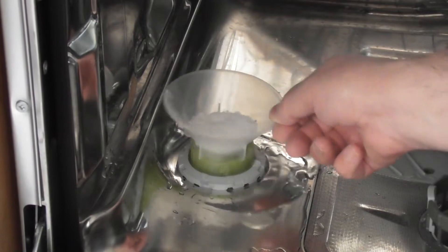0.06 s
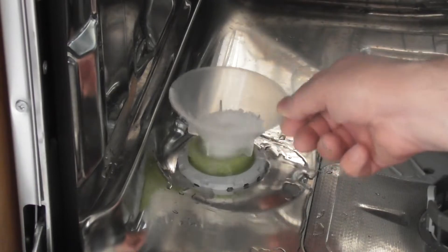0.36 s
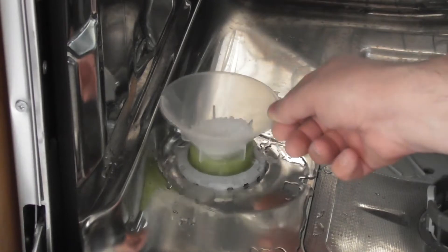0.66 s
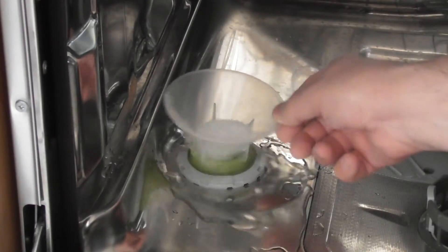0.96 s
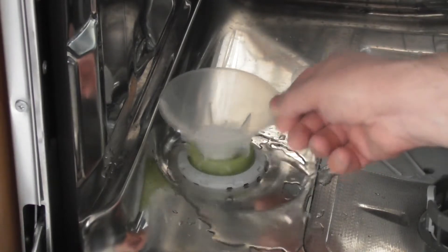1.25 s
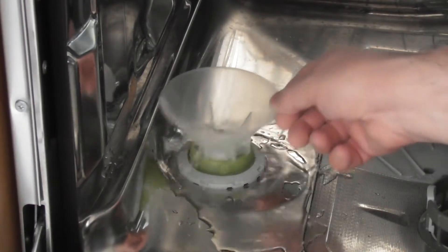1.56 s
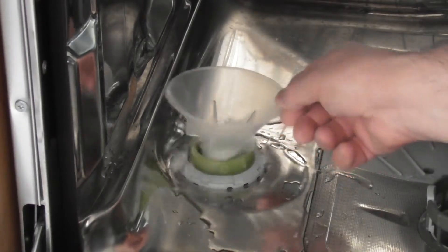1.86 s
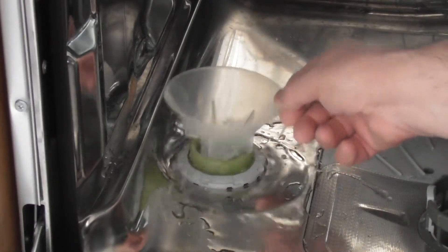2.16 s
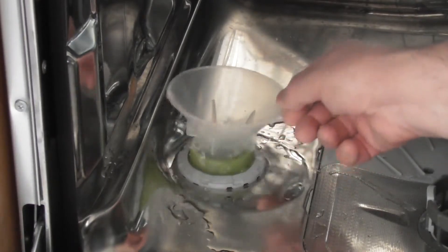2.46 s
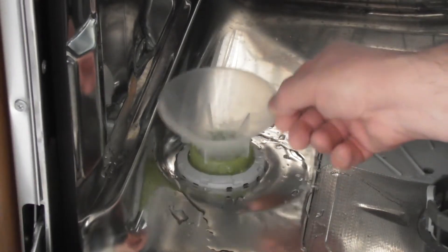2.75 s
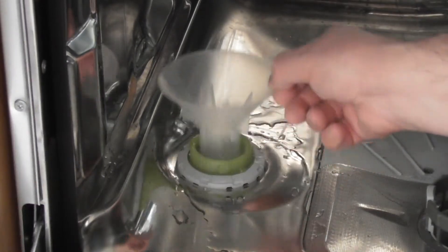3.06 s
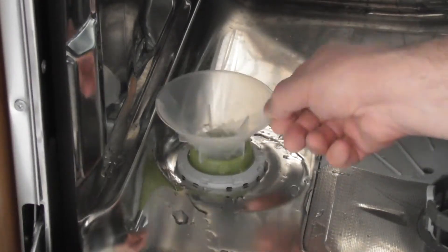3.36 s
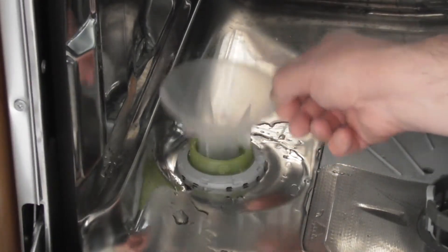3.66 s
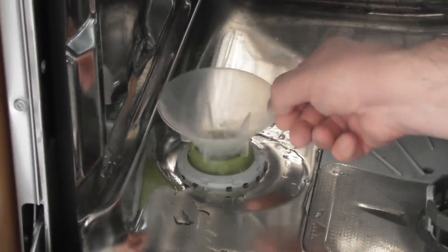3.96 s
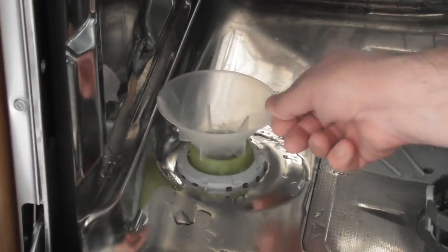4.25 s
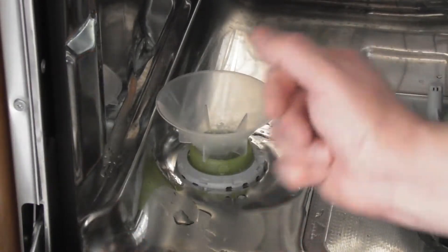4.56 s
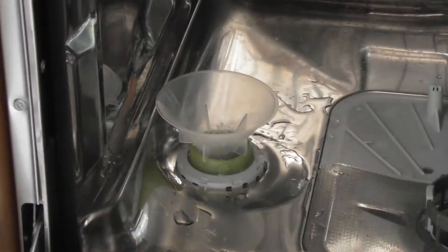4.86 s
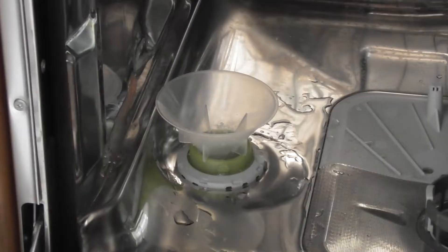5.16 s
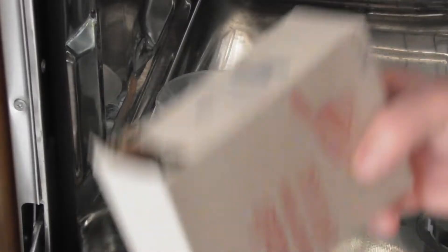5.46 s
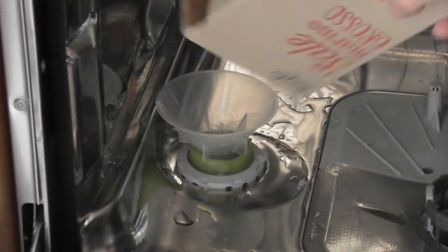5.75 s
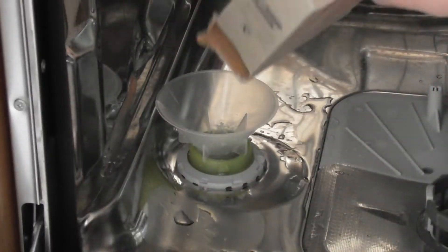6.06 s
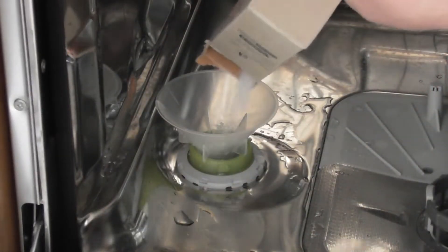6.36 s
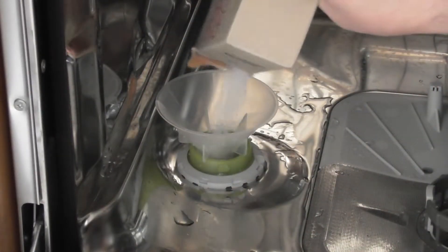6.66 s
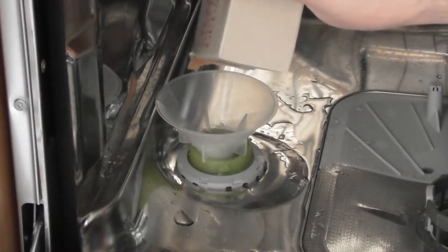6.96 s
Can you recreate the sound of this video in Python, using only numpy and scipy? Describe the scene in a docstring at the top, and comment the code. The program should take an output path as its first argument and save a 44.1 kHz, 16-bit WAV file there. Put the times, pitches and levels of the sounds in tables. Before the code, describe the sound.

For the first 2.4 seconds a plastic funnel knocks against a tank neck in a steel dishwasher tub, up to about seven times a second and growing louder. Each knock has a short metallic ring, a gritty rattle of coarse salt and a soft low gulp from the tank. From about 2 to 3 seconds a few small water blips sound. The knocks then thin out, with light rim ticks, short slips of salt and stronger single knocks near 2.7, 3.4 and 4 seconds. From 4.5 seconds it is quieter: a cardboard box is picked up with dull bumps, and salt shifts inside in brief rustles. At 6 seconds salt slides along the card and pours into the funnel with a bright, crackling hiss, fading just after 7 seconds. Everything is close, with brief steel reflections over faint kitchen air.

```python
"""Coarse salt is shaken down a plastic funnel into the softener tank of a steel dishwasher tub.
For 2.4 s the spout knocks on the filler neck, up to about seven times a second; crystals hop, land
and trickle, and the tank gulps. The knocks thin out, with water blips and light ticks on the rim.
From 4.5 s a cardboard box is picked up: it bumps, and the salt shifts inside. At 6 s it is tilted:
salt slides along the card and rattles into the funnel."""
import sys
import numpy as np
from scipy import signal
from scipy.fft import rfft, irfft, next_fast_len
from scipy.io import wavfile
from scipy.ndimage import uniform_filter1d, map_coordinates

SR = 44100
rng = np.random.default_rng(int(sys.argv[2]) if len(sys.argv) > 2 else 0)


def persist_wave(psi):
    """Save psi, clipped to +-1, as 16-bit WAV."""
    counts = np.round(np.clip(psi, -1, 1) * 32767).astype(np.int16)
    wavfile.write(sys.argv[1], SR, np.atleast_2d(counts).T)


N = 317961

# Table levels are relative; spectra give shape only.
# kitchen air, coloured by the tub: freq_hz, density_db
AIR_SPECTRUM = [(25, -28), (50, 8), (100, -4), (200, 0.5), (450, -10), (900, -7), (1100, -18), (1350, -12),
                (1700, -26), (2600, -26), (3800, -18), (5200, -27), (7800, -21.5), (15800, -30)]
# low hum: pitch_hz, level_db
HUM_TONES = [(48.4, -69.5)]
# ring of the tub: freq_hz, t60_s
TUB_DECAY = [(150, .3), (600, .36), (2000, .38), (8000, .28), (15000, .22)]
# stereo width: freq_hz, side_db
SIDE_GAIN = [(60, -4), (170, -9), (350, -13), (1400, -22), (2800, -50), (6000, -94), (9000, -22),
             (12000, -7.5)]

# water blips at the neck of the full tank: start_s, pitch_hz, level_db
WATER_BLIPS = [(1.925, 2920, -40), (2.025, 1990, -37), (2.19, 950, -55), (2.607, 820, -43),
               (2.64, 686, -41), (2.673, 2040, -41), (2.722, 2000, -36), (2.878, 2320, -42)]
# funnel touches the rim: start_s, level_db
RIM_TICKS = [(3.145, -36.5), (3.25, -46.5), (3.5427, -42.5), (3.579, -40.5), (3.647, -47), (3.823, -49),
             (3.8543, -46), (4.0567, -36)]
# ring of the rim: pitch_hz, level_db, t60_s
RIM_MODES = [(3560, -10, .06), (3810, -10, .07)]

# salt shifts in the lifted box: start_s, crystals_db, card_db, rise_s, t60_s
BOX_SHIFTS = [(4.53, -61, -52.5, 0.022, 0.68), (4.70, -46, -53, 0.025, 0.86),
              (4.996, -41.5, -46, 0.012, 0.4), (5.107, -37, -46, 0.0084, 0.39),
              (5.248, -40, -40.5, 0.017, 0.31), (5.317, -47, -50.5, 0.0028, 0.96),
              (5.654, -59, -54.5, 0.0064, 0.32), (5.774, -47.5, -50, 0.018, 0.58),
              (5.869, -43, -45.5, 0.0089, 0.69), (5.941, -37, -41, 0.0096, 0.18)]
# hand bumps the box: centre_s, level_db, half_width_s
HAND_BUMPS = [(4.833, -45, 0.096), (5.05, -45.5, 0.073), (5.5, -53.5, 0.22)]
# handled box: freq_hz, density_db
BUMP_SPECTRUM = [(30, 9), (65, -1), (130, 8), (220, 2), (300, -7), (450, 6), (800, -1.5), (1400, -9),
                 (2500, -25.5)]
# salt on cardboard: freq_hz, density_db
CARD_SPECTRUM = [(900, -22.5), (1600, 1), (2500, -7), (3700, 3), (4300, -1), (5000, -8.5), (6200, 1.5),
                 (9000, -29)]
# hollow box: freq_hz, density_db
BOX_SPECTRUM = [(180, -51), (300, -64), (317, -56), (387, -4.5), (589, 6.5), (674, -12), (778, 7),
                (904, -5), (1280, 3), (1510, -8.5), (1640, -19), (2000, -22), (2600, 7), (4400, -120)]
# empty funnel: freq_hz, density_db
FUNNEL_SPECTRUM = [(350, -43), (480, -4.5), (590, 4.5), (680, -6), (780, 6.5), (900, -8.5), (1300, -36),
                   (2000, -54)]
# course of the pour: time_s, crystals_db, slide_db, box_wall_db
POUR_LEVELS = [(6.0, -56, -52, -53.5), (6.134, -28, -33, -37), (6.258, -33, -36.5, -39),
               (6.302, -27, -44, -46.5), (6.434, -20, -44, -45.5), (6.534, -25, -43, -45),
               (6.808, -21.5, -37.5, -41), (7.006, -21.5, -46, -53.5), (7.068, -38, -48.5, -63),
               (7.21, -51.5, -63.5, -65)]
# lumps in the poured stream: start_s, level_db
SALT_LUMPS = [(6.289, -9.5), (6.321, -13.5), (6.4175, -12), (6.649, -7.5), (6.7098, -22), (6.775, -7),
              (6.8382, -6), (6.915, -13), (6.947, -13.5), (7.06, -19.5), (7.083, -20), (7.104, -28),
              (7.131, -26.5)]
# falling salt: freq_hz, density_db
POURED_SPECTRUM = [(2500, -44), (3900, -13), (5000, -19), (6000, -3), (7500, 2.5), (9300, 1), (11000, -6.5),
                   (12500, -14), (15800, -22.5)]

# trickling salt and stirring spout: time_s, trickle_db, stir_db
TRICKLE_LEVELS = [(0.0, -41.5, -42), (0.29, -52.5, -59.5), (0.63, -46, -48.5), (2.33, -49.5, -43),
                  (2.96, -54, -53.5), (3.12, -62.5, -55.5), (3.4, -62, -65), (3.51, -60, -51.5),
                  (4.22, -55, -48), (4.5, -69, -65.5)]
# salt flow through the spout: time_s, flow_db
SPOUT_FLOW = [(0, -18), (.72, -14), (1.0, -5.5), (1.4, -0.5), (1.95, 0), (2.42, -2.5), (2.55, -13.5),
              (3.0, -9), (3.39, -5), (3.9, -14), (4.2, -10)]
# salt slips down the funnel wall: start_s, level_db, rise_s, t60_s
SALT_SLIPS = [(0.02, -43, .02, .2), (0.255, -42.5, 0.008, 0.23), (0.32, -39.5, 0.017, .2),
              (0.525, -41, .005, .1), (0.88, -36, .006, .12), (1.012, -34, .008, 0.14),
              (1.586, -39, 0.01, 0.066), (2.545, -34.5, 0.0065, 0.085), (2.785, -40, 0.01, 0.5),
              (2.93, -37.5, 0.02, 0.15), (3.0, -43, 0.018, 0.26), (3.337, -34, .003, 0.21),
              (3.351, -23.5, .013, .1), (3.509, -45, 0.0095, 0.14), (3.728, -26.5, 0.0064, .09),
              (3.79, -44.5, 0.037, 0.11), (4.045, -44, 0.0063, 0.17), (4.167, -32, 0.0019, 0.28),
              (4.36, -51.5, 0.014, 0.17)]
# shaken salt: freq_hz, density_db
SHAKEN_SPECTRUM = [(1500, -3.5), (2800, -8.5), (3800, -2.5), (5000, -9.5), (6400, 6), (8500, 7),
                   (10500, -3.5), (12500, -13.5), (15800, -24.5)]

# spout knocks on the neck and throws the salt; the last knock, at 5 s, is the box bumping
# as it is picked up: start_s, knock_db, landing_db
KNOCK_EVENTS = [(0.105, -22.5, -30), (0.363, -24.5, -25.5), (0.466, -20.5, -26.5), (0.61, -20.5, -24.5),
                (0.709, -21, -34), (0.841, -18, -29.5), (0.979, -18, -34), (1.122, -19, -32.5),
                (1.25, -19, -28), (1.392, -14, -27), (1.538, -12, -29), (1.678, -20.5, -34),
                (1.811, -14, -28), (1.954, -14.5, -27.5), (2.101, -11.5, -30), (2.245, -12, -27),
                (2.393, -11, -25.5), (2.513, -31, -40), (2.693, -17.5, -38), (2.837, -27, -50),
                (2.965, -33.5, -47), (3.148, -36.5, -38), (3.388, -13.5, -48), (3.578, -31, -41),
                (3.712, -29.5, -41.5), (3.965, -13.5, -27.5), (4.211, -22.5, -51), (5.013, -31.5, -40)]
# funnel, neck and tub floor ringing together: pitch_hz, level_db, t60_s
NECK_MODES = [(395, -22, 0.17), (476, -22, 0.16), (544.5, -3, 0.24), (644.8, -15, 0.32), (793, -14.5, 0.19),
              (927, -33, 0.16), (1017, -19, 0.43), (1253, -16, 0.34), (1336, -4, 0.073),
              (1431.4, -15.5, 0.16), (1651, -8, 0.072), (1670, -9.5, 0.14), (1830, -19, 0.044),
              (1969, -14, 0.096)]
# dense ring of sheet steel: freq_hz, density_db
STEEL_SPECTRUM = [(150, -40), (250, -17), (313, -30.5), (416, -7.5), (537, 9), (727, -31.5), (911, 4.5),
                  (1120, -14), (1340, 5), (1520, -25), (1690, -3.5), (2180, -24.5), (2600, -27),
                  (3380, -38), (5720, -120)]
# hard plastic contact: freq_hz, density_db
PLASTIC_SPECTRUM = [(1200, -26), (2000, 10), (2600, 6.5), (3700, 18.5), (4500, 11.5), (5200, 4),
                    (9000, -41)]
# salt dropping in the tank: freq_hz, density_db
THUD_SPECTRUM = [(40, -26), (80, -2.5), (120, -9.5), (180, 4.5), (280, -7.5), (500, -43.5)]


def amp(db):
    """Decibels to gain."""
    return 10 ** (np.asarray(db) / 20)


def unit_rms(x):
    """Scale to rms 1."""
    return x / np.sqrt(np.mean(x ** 2) + 1e-20)


def log_interp(points, hz):
    """Read (freq_hz, value) points on a log axis."""
    freq_hz, values = np.transpose(points)
    return np.interp(np.log(hz + 1), np.log(freq_hz + 1), values)


def envelopes(rows):
    """One gain curve per dB column, silent outside the table."""
    time_s, *columns = np.transpose(rows)
    curves_db = [np.interp(np.arange(N) / SR, time_s, db, left=-120, right=-120) for db in columns]
    return [uniform_filter1d(amp(db), size=128) for db in curves_db]


def add(track, start_s, sound):
    """Mix a sound into a track."""
    start = max(round(start_s * SR), 0)
    track[start:start + len(sound)] += sound[:N - start]


def filtered(x, response):
    """Apply a complex frequency response."""
    size = next_fast_len(N + SR // 2)
    return irfft(rfft(x, size) * response(np.fft.rfftfreq(size, 1 / SR)), size)[..., :N]


def colour(x, spectrum, size=4096):
    """Minimum-phase filter that keeps the power of white noise."""
    magnitude = amp(log_interp(spectrum, np.fft.rfftfreq(size, 1 / SR)))
    cepstrum = irfft(np.log(np.maximum(magnitude, 1e-6)))
    cepstrum[1:size // 2] *= 2
    cepstrum[size // 2 + 1:] = 0
    pulse = irfft(np.exp(rfft(cepstrum)))
    return signal.fftconvolve(x, pulse / np.linalg.norm(pulse))[:N]


def wobble(rate_hz):
    """Smooth random curve through rate_hz knots a second."""
    knots = rng.standard_normal(int(N * rate_hz / SR) + 4)
    return map_coordinates(knots, [np.arange(N) * rate_hz / SR])


def patter(rate_hz, spread_db, hiss_db):
    """Tiny random impacts of uneven size over the hiss of finer dust, rms 1."""
    sizes = amp(spread_db * np.clip(rng.standard_normal(N), -2, 2)) * rng.choice([-1, 1], N)
    impacts = unit_rms(sizes * (rng.random(N) < rate_hz / SR))
    return unit_rms(impacts + amp(hiss_db) * rng.standard_normal(N))


def burst(t, rise_s, t60_s):
    """Envelope of a blow: quick swell, exponential fall."""
    return (1 - np.exp(-(t / rise_s) ** 2)) * amp(-60 * t / t60_s)


def outflow_db(time_s):
    """How freely salt runs through the spout."""
    return np.interp(time_s, *np.transpose(SPOUT_FLOW))


def room_tone(air_db=-58.5, hum_gain_db=-1):
    """Quiet kitchen air and a wavering low hum."""
    t = np.arange(N) / SR
    hum = np.zeros(N)
    for hz, db in HUM_TONES:
        phase = 2 * np.pi * hz * t + 0.3 * wobble(2.32)
        hum += amp(db + hum_gain_db) * np.sqrt(2) * np.sin(phase)
    return hum + amp(air_db) * colour(rng.standard_normal(N), AIR_SPECTRUM)


def tub_reflections(x, echo_gain=0.87, echo_s=0.002889, echo_above_hz=5500, early_db=-7, tail_db=-13):
    """A near steel wall mirrors the treble; the other walls scatter the sound and ring briefly."""
    def near_wall(hz):
        mirror = echo_gain / (1 + (echo_above_hz / (hz + 1)) ** 6)
        return (1 + mirror * np.exp(-2j * np.pi * hz * echo_s)) / np.hypot(1, mirror)

    near = filtered(x, near_wall)
    hz, frame_s, noise = signal.stft(rng.standard_normal(SR // 2), SR, nperseg=256)
    decay = amp(-60 * frame_s / log_interp(TUB_DECAY, hz)[:, None])
    _, tail = signal.istft(noise * decay, SR, nperseg=256)
    t = np.arange(len(tail)) / SR
    early = np.diff(rng.standard_normal(len(t) + 1)) * burst(t, 0.0008, 0.0088)
    walls = amp(early_db) * early / np.linalg.norm(early) + amp(tail_db) * tail / np.linalg.norm(tail)
    return near + signal.fftconvolve(near, walls)[:N]


def bubble(hz, t60_cycles):
    """A bubble rings and fades, rising in pitch."""
    t = np.arange(SR // 10) / SR
    return burst(t, 1 / hz, t60_cycles / hz) * np.sin(2 * np.pi * hz * t * (1 + t))


def water(centre_hz=900, spread_octaves=1.204, froth_db=-4, bubble_count=1400):
    """Water stirred by the spout: a soft froth of tiny bubbles and a few clear blips."""
    froth, blips = np.zeros((2, N))
    stir_end_s = TRICKLE_LEVELS[-1][0]
    for when, pitch in rng.random((bubble_count, 2)):
        hz = centre_hz * 2 ** (spread_octaves * (2 * pitch - 1))
        add(froth, when * stir_end_s, bubble(hz, t60_cycles=11.4))
    for start_s, hz, db in WATER_BLIPS:
        add(blips, start_s, amp(db) * bubble(hz, t60_cycles=88))
    _, stir = envelopes(TRICKLE_LEVELS)
    return amp(froth_db) * stir * unit_rms(froth) + blips


def stray_crystals(gain_db=-11):
    """Single crystals hop in the funnel and tick on its plastic wall."""
    trickle, _ = envelopes(TRICKLE_LEVELS)
    hops = patter(rate_hz=60, spread_db=3, hiss_db=-30)
    return colour(trickle * amp(gain_db) * hops, SHAKEN_SPECTRUM)


def rim_ticks(touch_db=-4, steel_db=-1, lead_s=0.0036):
    """Light touches of plastic ring the rim and stir the steel."""
    touches, ring = np.zeros((2, N))
    t = np.arange(SR // 4) / SR
    for start_s, db in RIM_TICKS:
        add(touches, start_s - lead_s, amp(db + touch_db) * burst(t, 0.0021, 0.13))
        for hz, mode_db, t60_s in RIM_MODES:
            add(ring, start_s, amp(db + mode_db) * burst(t, 0.0014, t60_s) * np.sin(2 * np.pi * hz * t))
    contact = touches * rng.standard_normal(N)
    return ring + colour(contact, PLASTIC_SPECTRUM) + amp(steel_db) * colour(contact, STEEL_SPECTRUM)


def box_pickup(shift_db=-1, wall_db=-4, bump_db=-3):
    """The hand bumps the box dully; the salt inside slips in short rustles."""
    crystals, card = np.zeros((2, N))
    t = np.arange(SR) / SR
    for start_s, crystals_db, card_db, rise_s, t60_s in BOX_SHIFTS:
        shift = burst(t, rise_s, t60_s)
        add(crystals, start_s, amp(crystals_db + shift_db) * shift)
        add(card, start_s, amp(card_db + shift_db) * shift)
    rub = card * patter(rate_hz=5500, spread_db=6.5, hiss_db=1.5)
    hiss = colour(crystals * patter(rate_hz=1400, spread_db=2, hiss_db=-9), SHAKEN_SPECTRUM)
    hand = sum(amp(db) / np.cosh((np.arange(N) / SR - centre_s) / half_width_s) ** 2
               for centre_s, db, half_width_s in HAND_BUMPS)
    bumps = colour(hand * amp(bump_db + 1.4 * wobble(35)) * rng.standard_normal(N), BUMP_SPECTRUM)
    return hiss + colour(rub, CARD_SPECTRUM) + amp(wall_db) * colour(rub, BOX_SPECTRUM) + bumps


def box_slide(slide_db=1, landing_s=6.205, landing_db=-31.5):
    """Salt slides on the card and drums the hollow box; the first of it rings the empty funnel."""
    _, slide, wall = envelopes(POUR_LEVELS)
    grit = patter(rate_hz=5000, spread_db=5, hiss_db=-5)
    sliding = colour(slide * amp(slide_db) * grit, CARD_SPECTRUM)
    drumming = colour(wall * patter(rate_hz=1500, spread_db=3, hiss_db=-5.5), BOX_SPECTRUM)
    landing = burst(np.maximum(np.arange(N) / SR - landing_s, 0), rise_s=0.022, t60_s=0.52)
    funnel = colour(amp(landing_db) * landing * rng.standard_normal(N), FUNNEL_SPECTRUM)
    return sliding + drumming + funnel


def poured_salt(flow_db=-1.5, coarse_db=-5, fall_s=6.28, strike_db=14, shatter_db=-5, surge_db=-13,
                offset_s=0.00085):
    """Loose crystals hiss inside the box, then fall and tick one by one on the funnel."""
    flow, _, _ = envelopes(POUR_LEVELS)
    debris, strikes = np.zeros((2, N))
    t = np.arange(SR // 4) / SR
    for start_s, db in SALT_LUMPS:  # a lump strikes, shatters and drags more salt after it
        add(strikes, start_s + offset_s, amp([db + strike_db]))
        shatter = amp(db + shatter_db) * burst(t, 0.0017, 0.057)
        surge = amp(db + surge_db) * burst(t, 0.011, 0.061)
        add(debris, start_s - offset_s, shatter + surge)
    inside = patter(rate_hz=5000, spread_db=4, hiss_db=0)
    fine = patter(rate_hz=1400, spread_db=5, hiss_db=-8)
    coarse = patter(rate_hz=130, spread_db=3, hiss_db=-40)
    falling = (fine + amp(coarse_db) * coarse) * amp(1.3 * wobble(60))
    crystals = np.where(np.arange(N) / SR < fall_s, inside, falling)
    spray = debris * patter(rate_hz=4000, spread_db=2, hiss_db=-5)
    return colour(flow * amp(flow_db) * crystals + strikes + spray, POURED_SPECTRUM)


def shaken_salt(clump_db=-3.2, rise_s=0.024, settle_s=0.1, packed_lag_s=0.002, loose_lead_s=0.011,
                hop_s=0.031, hop_db=-2, hop_db_per_flow_db=0.45, trickle_db=-2, scrape_db=-4):
    """At each knock a clump lands and hops once; in between, salt slips and the spout scrapes."""
    power = np.zeros(N)
    t = np.arange(-SR // 16, SR // 3) / SR
    gathering = amp(-14 - 60 * np.abs(t) / 0.095)
    clump = gathering + amp(60 * np.minimum(t / rise_s, -t / settle_s))
    for knock_s, _, landing_db in KNOCK_EVENTS:
        flow_db = outflow_db(knock_s)
        # packed salt lands just after the knock, loose salt ahead of it
        start_s = knock_s + packed_lag_s - loose_lead_s * amp(flow_db) + t[0]
        landing = amp(landing_db + clump_db) * clump
        hop = amp(hop_db + hop_db_per_flow_db * flow_db) * landing
        add(power, start_s, landing ** 2)
        add(power, start_s + hop_s, hop ** 2)
    for start_s, db, slip_rise_s, t60_s in SALT_SLIPS:
        slip = burst(t[t >= 0], slip_rise_s, t60_s)
        add(power, start_s, (amp(db) * slip / slip.max()) ** 2)
    trickle, stir = envelopes(TRICKLE_LEVELS)
    power += (trickle * amp(trickle_db + 3 * wobble(50))) ** 2
    salt = np.sqrt(power) * patter(rate_hz=2000, spread_db=-1.5, hiss_db=0.5)
    scrape = stir * amp(scrape_db) * patter(rate_hz=380, spread_db=1, hiss_db=1)
    return colour(salt, SHAKEN_SPECTRUM) + colour(scrape, STEEL_SPECTRUM)


def tank_gulps(pitch_hz=183, gulp_db=-26, thud_db=-32, delay_s=0.009, db_per_knock_db=0.37):
    """Salt freed by each knock thuds into the tank, which gulps with one low bubble."""
    gulps, thuds = np.zeros((2, N))
    t = np.arange(SR // 2) / SR
    for knock_s, knock_db, _ in KNOCK_EVENTS:
        swell = amp(db_per_knock_db * knock_db + outflow_db(knock_s)) * burst(t, 0.0081, 0.25)
        hz = pitch_hz * (1 + 0.024 * rng.standard_normal())
        add(gulps, knock_s + delay_s, amp(gulp_db) * swell * np.sin(2 * np.pi * hz * t))
        add(thuds, knock_s + delay_s, amp(thud_db) * swell)
    return gulps + colour(thuds * rng.standard_normal(N), THUD_SPECTRUM)


def knocks(ring_db=-8, scatter_db=2.5, steel_db=-2.5, plastic_db=-13, lead_s=0.002963,
           rebound_s=0.017, rebound_db=-11, packed_until_s=0.66, packed_db=-25):
    """Each blow (the spout's; last, the box's) rings the neck and steel floor and rebounds once."""
    ring, steel, plastic = np.zeros((3, N))
    t = np.arange(SR // 2) / SR
    mode_hz, mode_db, t60_s = np.transpose(NECK_MODES)[:, :, None]
    for knock_s, db, _ in KNOCK_EVENTS:
        contact_s = knock_s - lead_s
        # the spout sits differently every time
        strength = amp(mode_db + scatter_db * rng.standard_normal(mode_hz.shape))
        hz = mode_hz * (1 + 0.0162 * rng.standard_normal(mode_hz.shape))
        phase = 2 * np.pi * (hz * t + rng.random(mode_hz.shape))
        modes = strength * burst(t, 0.0018, t60_s) * np.sin(phase)
        add(ring, contact_s, amp(db + ring_db) * modes.sum(axis=0))
        add(steel, contact_s, amp(db + steel_db) * burst(t, 0.0026, 0.075))
        add(steel, knock_s + rebound_s, amp(db + rebound_db) * burst(t, 0.011, 0.11))
        # packed salt muffles the first clacks
        clack_db = db + plastic_db + packed_db * (knock_s < packed_until_s)
        add(plastic, contact_s, amp(clack_db) * burst(t, 0.005, 0.047))
        add(plastic, contact_s + rebound_s, amp(clack_db - 17.5) * burst(t, 0.01, 0.2))
    floor = colour(steel * rng.standard_normal(N), STEEL_SPECTRUM)
    clacks = colour(plastic * rng.standard_normal(N), PLASTIC_SPECTRUM)
    return ring + floor + clacks


def scene():
    """All sources centred in the tub, over room tone; slight width in bass and top."""
    filling = knocks() + tank_gulps() + rim_ticks() + water() + shaken_salt() + stray_crystals()
    pouring = box_pickup() + box_slide() + poured_salt()
    mid = tub_reflections(filling + pouring) + room_tone()
    scatter = np.pad(rng.standard_normal(SR // 60), (SR // 300, 0))
    diffuse = signal.fftconvolve(mid, scatter / np.linalg.norm(scatter))[:N]
    side = filtered(diffuse, lambda hz: amp(log_interp(SIDE_GAIN, hz)))
    return np.array([mid + side, mid - side])


def record(dry, low_hz=41, top_hz=15850, ceiling=0.8):
    """Round the highest peaks; cut the deepest bass and everything above top_hz."""
    rounded = dry / (1 + (dry / ceiling) ** 6) ** (1 / 6)
    return filtered(rounded, lambda hz: (hz < top_hz) / np.sqrt(1 + (low_hz / (hz + 1)) ** 10))


dry = scene()
out = record(dry)
persist_wave(out)
```